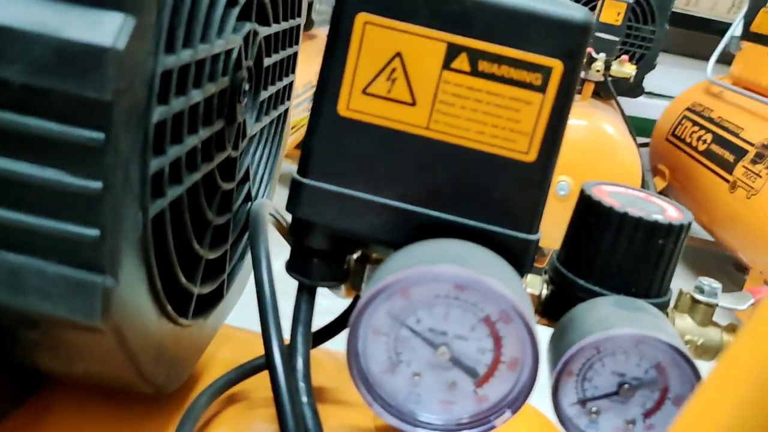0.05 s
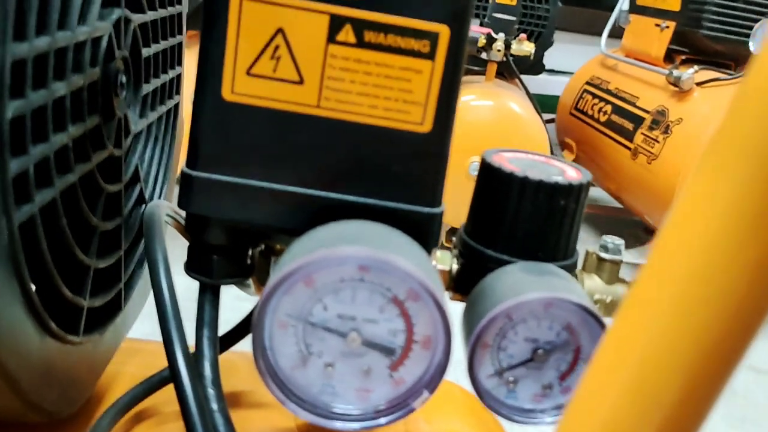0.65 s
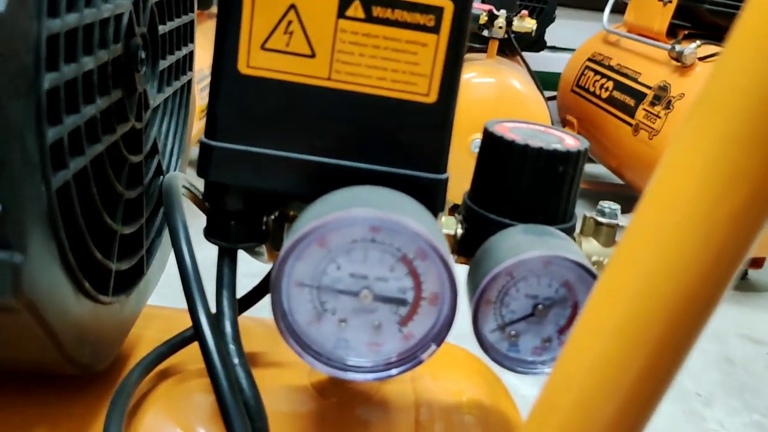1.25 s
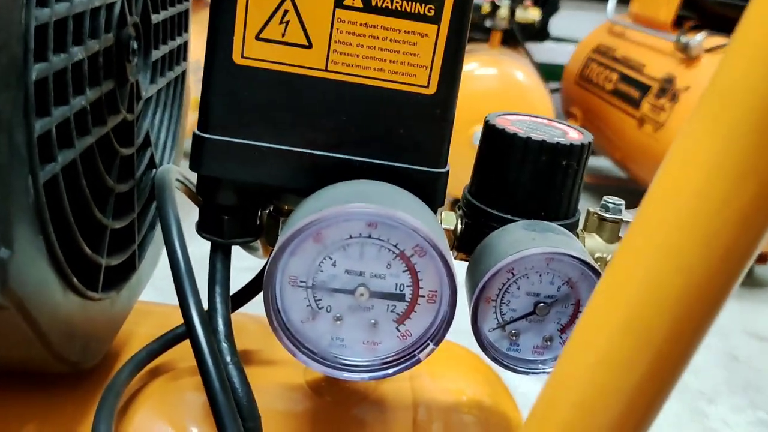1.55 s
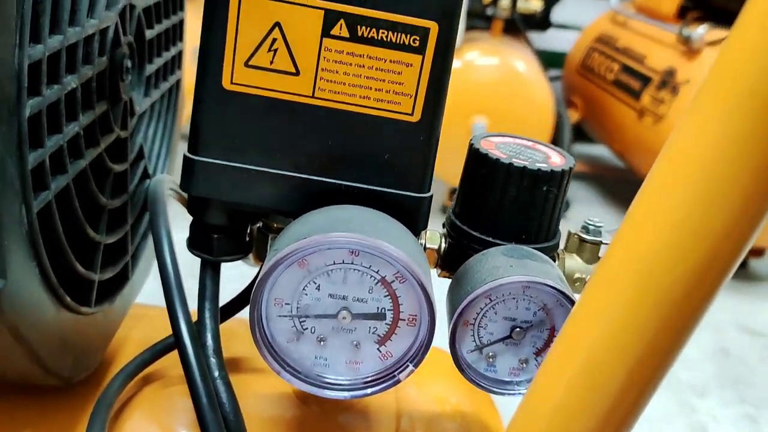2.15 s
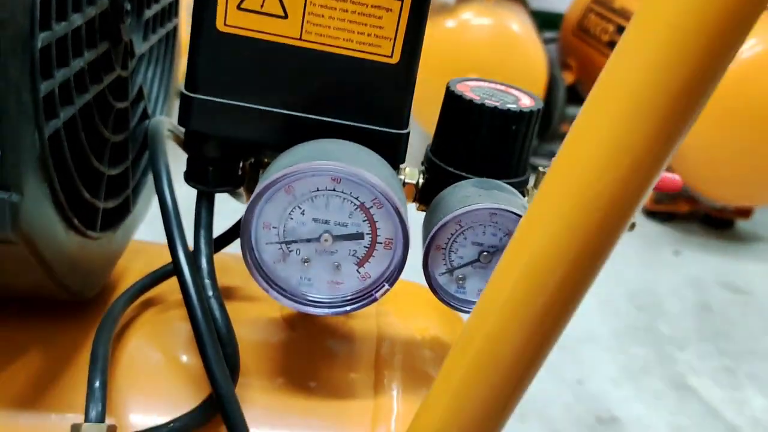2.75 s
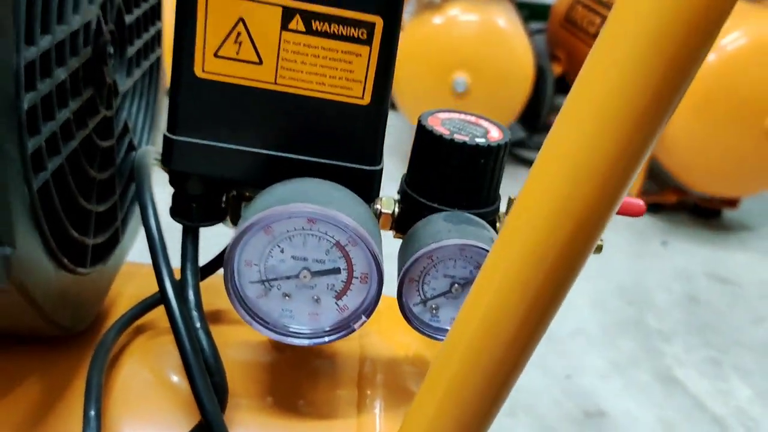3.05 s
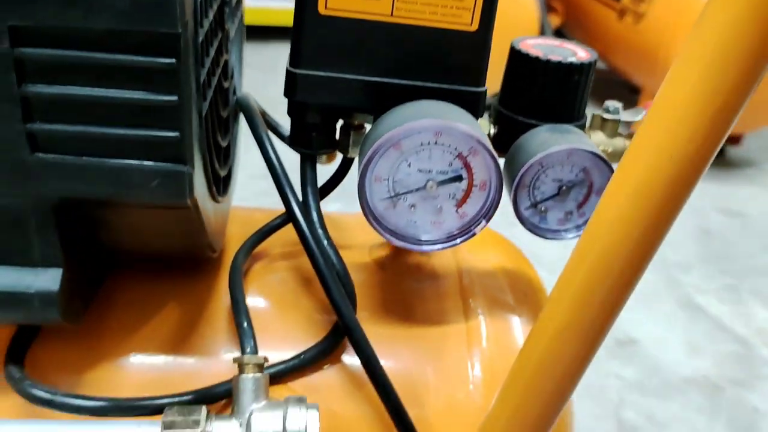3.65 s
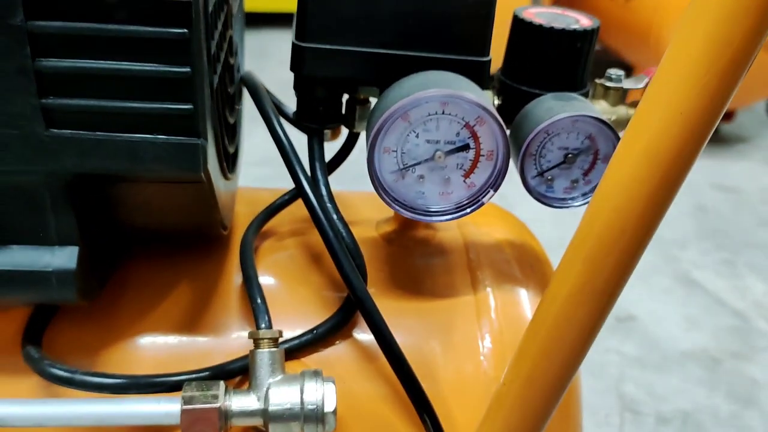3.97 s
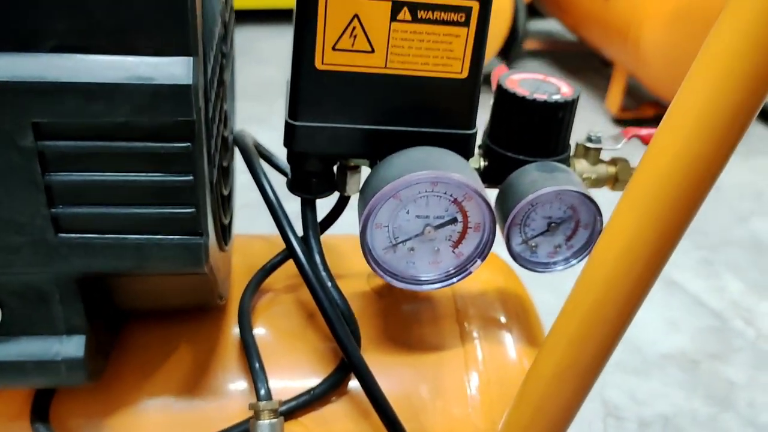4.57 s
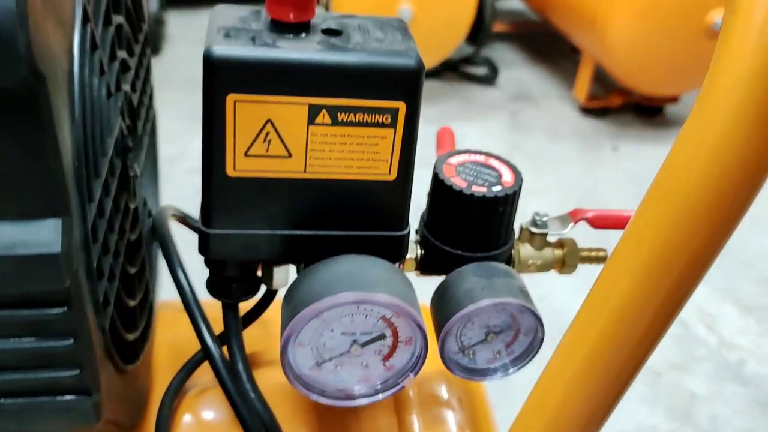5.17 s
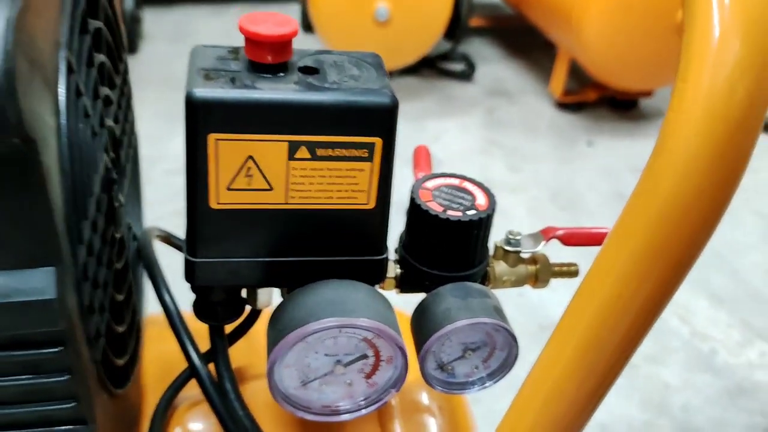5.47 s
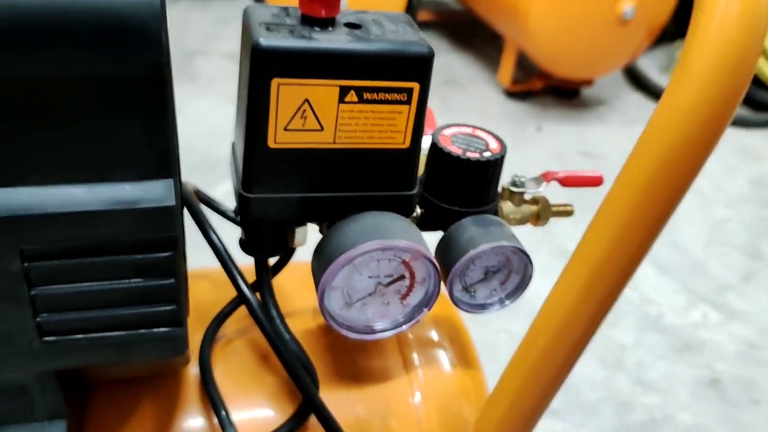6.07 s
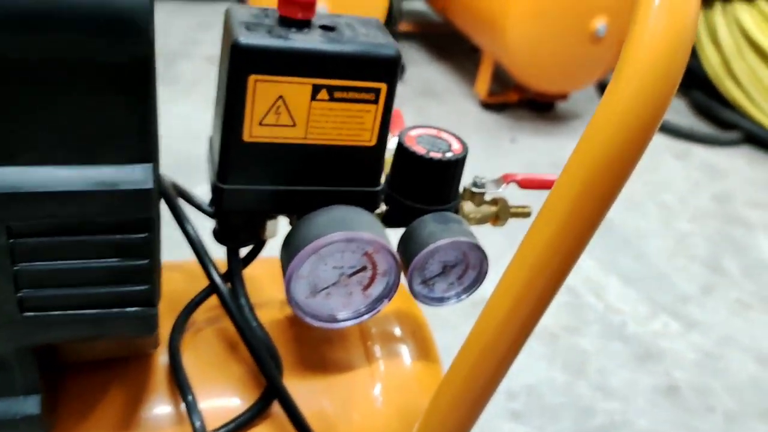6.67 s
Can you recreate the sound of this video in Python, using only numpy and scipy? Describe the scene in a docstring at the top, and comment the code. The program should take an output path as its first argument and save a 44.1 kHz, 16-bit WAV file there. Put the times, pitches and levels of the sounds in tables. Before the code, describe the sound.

Compressed air escapes from the open valve of a workshop compressor tank in a loud, continuous hiss. The close, hand-held microphone starts in the draught, so low wind rumble, flutter and a few sharp pops cover the jet. As the microphone backs away the buffeting fades, and the hiss grows clearer and slightly louder, its high sizzle sliding down in pitch.

```python
"""A loud hiss, buffeted by wind: compressed air leaves the open valve of a workshop compressor tank.
Turbulent mixing in the jet radiates broadband noise, heard directly, by reflection and as room sound.
A hand-held microphone starts in the draught, where eddies rumble, patter and slap on its two ports.
As it backs out, the buffeting fades and the jet is heard more openly; the jet is directional,
so its sizzling peak slides down in pitch as the angle changes."""
import sys
import numpy as np
from scipy import signal
from scipy.fft import rfft, irfft, next_fast_len
from scipy.io import wavfile

SR = 44100
rng = np.random.default_rng(int(sys.argv[2]) if len(sys.argv) > 2 else 0)


def inscribe(sig):
    """Save sig as 16-bit PCM at rate SR to the path in sys.argv[1].

    A 1-D sig is mono; a 2-D sig holds one channel per row.
    Samples are clipped to [-1, 1] before scaling.
    """
    pcm = np.round(np.clip(np.atleast_2d(sig).T, -1, 1) * 32767)
    wavfile.write(sys.argv[1], SR, pcm.astype(np.int16))


N = 305172

# Hiss at the microphone. Each row: time in seconds, relative level in dB.
HISS_LEVEL = [(0.0, -25), (0.17, -26), (1.02, -25), (1.44, -25.6), (1.56, -24.5), (2.62, -23.5),
              (3.2, -22.5), (3.57, -23), (3.66, -25), (3.82, -22.5), (3.95, -24), (4.05, -23.5),
              (4.3, -23.5), (4.37, -21.5), (4.55, -22), (5.15, -21), (5.22, -20.5), (5.99, -20),
              (6.06, -20.5), (6.17, -19.7), (6.25, -20.5), (6.92, -19)]
# Spectrum of the jet. Each row: frequency in Hz, relative spectral level in dB.
JET_SPECTRUM = [(60, -28), (350, -9), (900, -8.5), (1500, -7), (2000, -1.5), (2400, 2), (3600, 0.5),
                (4500, 1), (5700, 0.5), (7300, 0.5), (8400, 1), (9200, -3), (12300, -0.5), (13900, -2)]
# Resonances in the hiss. Each row: centre in Hz, width in Hz, lift in dB.
JET_RESONANCES = [(2945, 300, 2.5), (3910, 83, 1.6)]
# The microphone's way round the valve. Each row: time in seconds, open view of the jet from 0 to 1,
# left minus right in dB, lag of the left port in ms.
MIC_PATH = [(0, 0.03, 3, 0.2), (2.1, 0, 2, 0.21), (3.3, 0.04, 1.5, 0.2), (3.9, 0.33, 3.5, 0.18),
            (5.05, 0.25, 4, 0.18), (5.27, 0.2, 3.5, 0.268), (6, 0.68, 3.5, 0.26), (6.92, 0.96, 3, 0.29)]
# Shading of the hiss. Each row: frequency in Hz, gain in dB behind the fittings, gain in dB in open view.
SHADING = [(1400, -1.1, -0.9), (2360, -1.95, 1), (5930, 2.4, 1.1), (9540, 0.94, 3.5), (13600, 3.5, -9)]
# The sizzling peak, set by the angle to the jet. Each row: time in seconds, centre in Hz, lift in dB.
SIZZLE_PEAK = [(0, 15000, 0.5), (2.6, 14200, -2), (3.5, 13800, 1), (3.85, 13200, 4), (4.4, 11800, 2.5),
               (5.1, 10500, 3), (5.25, 10200, 4), (5.95, 10100, 3.5), (6.1, 9500, 0.3), (6.92, 9100, 2.5)]
PEAK_WIDTH_HZ = 2400
TROUGH_ABOVE_HZ, TROUGH_WIDTH_HZ, TROUGH_SHARE = 3300, 1300, 0.5   # a dip that follows the peak
# Nearness to the fittings. Each row: time in seconds, hollowness from 0 to 1.
HOLLOWNESS = [(0, 0), (1.4, 0), (1.6, 0.7), (2.5, 0.7), (2.8, 0.9), (3.5, 1), (3.7, 0.2), (4.4, 0)]
# Hollow colour among the fittings. Each row: centre in Hz, width in Hz, full lift in dB.
HOLLOW_BANDS = [(4130, 800, -0.4), (5000, 380, 2), (5750, 520, 2.5), (7300, 1000, -0.5),
                (10800, 2800, -1.3)]
# The highest treble. Each row: time in seconds, left lift in dB, right lift in dB.
TOP_TREBLE = [(0, 1.2, 0.8), (1.45, 2, 0.8), (1.6, 6, 1.6), (3.5, 3.6, 2.2), (3.8, 6, 1.5), (5.3, 1, 2),
              (6.92, 1, 3.7)]
TOP_TREBLE_HZ, TOP_TREBLE_WIDTH_HZ = 13950, 650
# Resonance of the right port, strongest facing the jet. Each row: time in seconds, lift in dB.
PORT_RING = [(0, 0.5), (2.4, 1), (5.1, 3.5), (5.25, 6.5), (5.98, 6), (6.1, 2.5), (6.92, 3)]
PORT_RING_HZ, PORT_RING_WIDTH_HZ = 8360, 1080
# Draught on the ports. Each row: time in seconds, relative level in dB, left minus right in dB.
DRAUGHT = [(0, -19, -1), (.3, -19.5, -0.5), (.55, -20, -2.5), (.75, -20, -1.5), (1.22, -21.5, 1.5),
           (1.5, -26, -2), (1.9, -27, -4.5), (2.1, -31.5, -7.5), (2.4, -30.5, -5), (2.6, -33.5, -9),
           (3.4, -39.5, -10), (3.7, -45, -7), (5.1, -43.5, -11.5), (5.35, -44, -19.5), (5.6, -43, -21),
           (5.97, -45.5, -26), (6.1, -42, -11), (6.92, -49, -18)]
# Spectrum of the buffeting. Each row: frequency in Hz, relative level in dB at the left, at the right.
BUFFET_SPECTRUM = [(20, -15, -15), (70, -6, -8.5), (125, -2.8, -4), (180, 0.2, -0.3), (350, -1, -0.8),
                   (700, -4.7, -2.4), (1200, -8.2, -5.4), (2000, -10.5, -8), (3000, -16, -13),
                   (6000, -40, -40)]
# Spectrum of the deep rumble. Each row: frequency in Hz, relative spectral level in dB.
RUMBLE_SPECTRUM = [(5, 5.5), (15, -4), (35, -1.5), (65, -13), (130, -12.5), (400, -31.5)]
# Rumble on the ports. Each row: time in seconds, relative level in dB, left minus right in dB.
RUMBLE_LEVEL = [(0, -38, 12), (1, -30.5, -4), (1.9, -27.5, 2), (2.15, -41, 17), (3, -38.5, 8),
                (3.8, -43.5, -1), (5.3, -46.5, -23), (5.9, -44, -28), (6.92, -46, -19)]
# Strong eddies. Each row: start in seconds, pulse level at the louder port in dB,
# left minus right in dB, share of the wake, share of the rebound.
SLAPS = [(1.375, -8, 16, 0.082, 0.01), (1.569, -9.5, -15, .15, 0.19), (1.7962, -10.5, 20, .05, 0.2),
         (1.853, -8.5, 19, .05, 0.47), (1.884, -16, 18, .1, .3), (1.928, -7.5, 13, .05, 0.27),
         (2.018, -14.5, 16, .05, .9), (2.183, -12, 19, .1, 0.095), (2.203, -12.5, 18, .2, .2),
         (2.377, -14.5, 15, .15, 0), (2.392, -15, 12, .2, 0), (2.435, -14.5, 16, .18, 0),
         (3.857, -12.5, 19, 0.24, 0.21), (5.354, -19, -22, 0.37, 0), (5.81, -19, -18, .2, 0),
         (5.988, -16, -20, 0.16, 0.16), (6.349, -29, -18, .4, 0.11), (6.451, -24, -20.5, 0.9, 0.11),
         (6.65, -24, -18, .4, 0)]
# Gusts. Each row: middle in seconds, length in seconds, level in dB, left minus right in dB.
GUSTS = [(0.302, 0.18, -28, 0), (0.458, .08, -29.5, 13), (0.773, 0.23, -26, 3), (1.0, 0.14, -29.5, -7),
         (1.2, 0.22, -27, 4), (1.64, 0.087, -34, 10), (2.558, 0.081, -43, 0), (5.337, .14, -39, -9),
         (5.88, .24, -39.5, -10)]
# Frequency response of the ports. Each row: frequency in Hz, left gain in dB, right gain in dB.
PORT_RESPONSE = [(1000, 0.2, -0.1), (2060, 1.2, -0.3), (2880, -0.5, 0.2), (3700, -0.3, 0.1),
                 (5500, -1.3, 1.2), (6600, -1.3, 1.3), (7700, -3.8, 1.6), (8600, -0.9, -0.3),
                 (9500, -0.6, 0.3), (10300, -0.2, -0.1), (12800, -0.4, 1), (13300, 0.4, 1.4)]

FITTINGS_SHADOW_DB = -3   # on the direct sound while the valve is hidden
SWIRL_DB, SWIRL_PER_S, SWIRL_WIDTH_HZ = 0.52, 2.7, 1640
# In the draught the jet roars; the lifts and the power share made at the ports hold at FULL_DRAUGHT_DB.
ROAR_HZ, ROAR_WIDTH_HZ, ROAR_LEFT_DB, ROAR_RIGHT_DB = 2130, 2920, 5, 13
ROAR_SHARE, FULL_DRAUGHT_DB = 0.56, -19.5
CUTOFF_HZ, CEILING = 14270, 0.85


def air_jet(level_db, flutter_db):
    """Turbulent mixing radiates noise; directivity and shadowing colour it as the microphone moves."""
    hiss_db, = in_time(HISS_LEVEL)
    view, pan_db, lag_ms = in_time(MIC_PATH)
    peak_hz, lift_db = in_time(SIZZLE_PEAK)
    draught_db, _ = in_time(DRAUGHT)
    draught = from_db(draught_db - FULL_DRAUGHT_DB)
    ring_db, = in_time(PORT_RING)
    hollowness, = in_time(HOLLOWNESS)
    top_db = in_time(TOP_TREBLE)

    def colour_db(hz, at):
        """Filters in cascade add in dB: first those common to both ports, then each port's own."""
        shaded_db, open_db = (at_hz(SHADING, hz, column) for column in (1, 2))
        view_db = shaded_db + view[at] * (open_db - shaded_db)
        hollow_db = hollowness[at] * sum(db * hump(hz, f, width) for f, width, db in HOLLOW_BANDS)
        trough = TROUGH_SHARE * hump(hz, peak_hz[at] + TROUGH_ABOVE_HZ, TROUGH_WIDTH_HZ)
        peak_db = lift_db[at] * (hump(hz, peak_hz[at], PEAK_WIDTH_HZ) - trough)
        shared_db = view_db + hollow_db + peak_db + swirl_db(hz, at)
        roar = hump(hz, ROAR_HZ, ROAR_WIDTH_HZ) * draught[at]
        right_db = ROAR_RIGHT_DB * roar + ring_db[at] * hump(hz, PORT_RING_HZ, PORT_RING_WIDTH_HZ)
        treble_db = top_db[:, None, at] * hump(hz, TOP_TREBLE_HZ, TOP_TREBLE_WIDTH_HZ)
        return shared_db + np.array([ROAR_LEFT_DB * roar, right_db]) + treble_db

    field = multipath(rng.standard_normal(N), lag_ms, direct_db=FITTINGS_SHADOW_DB * (1 - view),
                      echo_db=-2.5, room_db=2.0, nearest_ms=2.5, farthest_ms=17.0,
                      sway_ms=0.45, echo_from_hz=900)
    # noise made right at the ports carries no echoes
    local_share = np.clip(ROAR_SHARE * draught, 0, 1)
    field = np.sqrt(1 - local_share) * field + np.sqrt(local_share) * rng.standard_normal((2, N))
    hiss = recoloured(rms_one(shaped(field, jet_gain)), colour_db)
    return hiss * from_db(at_ports(hiss_db + level_db + flutter_db * drift(16), pan_db))


def jet_gain(hz):
    """Turbulence has a broad spectrum, on which each resonance raises a hump."""
    humps_db = sum(db / (1 + (2 * (hz - centre) / width) ** 2) for centre, width, db in JET_RESONANCES)
    return from_db(at_hz(JET_SPECTRUM, hz) + humps_db)


def swirl_db(hz, at):
    """Independent slow modulation of overlapping bands makes the colour of the hiss wander."""
    bands = (hump(hz, centre, SWIRL_WIDTH_HZ) for centre in np.linspace(1000, 14500, 14))
    return SWIRL_DB * sum(band * drift(SWIRL_PER_S)[at] for band in bands)


def multipath(jet, lag_ms, direct_db, echo_db, room_db, nearest_ms, farthest_ms, sway_ms, echo_from_hz):
    """Direct sound interferes with reflections off tank and fittings, over the room's diffuse field."""
    heard = from_db(direct_db) * np.array(delayed(jet, [lag_ms, 0]))
    # long waves diffract round the machine, only short ones are reflected
    reflected = signal.sosfilt(signal.butter(2, echo_from_hz, "high", fs=SR, output="sos"), jet)
    for port in heard:
        # the hand sways, and changing path lengths slide a fine comb through the hiss
        echo_ms = [ms * rng.uniform(0.85, 1.15) + sway_ms * drift(0.4)
                   for ms in np.geomspace(nearest_ms, farthest_ms, 6)]
        port += from_db(echo_db) * sum(delayed(reflected, echo_ms))
    diffuse = from_db(room_db) * rng.standard_normal((2, N))
    return rms_one(heard + diffuse)


def buffeting(level_db, rumble_db, lumpy_db, gusty_db, heaving_db):
    """Turbulent pressure is uncorrelated between the ports: each has quick lumps over a slow heave."""
    draught_db = at_ports(*in_time(DRAUGHT))
    heave_db = at_ports(*in_time(RUMBLE_LEVEL))
    out = np.zeros((2, N))
    for port in (0, 1):
        eddies = rng.standard_normal(N) * from_db(lumpy_db * drift(230) + gusty_db * drift(4.7))
        lumps = rms_one(shaped(eddies, lambda hz: from_db(at_hz(BUFFET_SPECTRUM, hz, port + 1))))
        out[port] += lumps * from_db(draught_db[port] + level_db)
        puffs = rng.standard_normal(N) * from_db(heaving_db * drift(8.6))
        heave = rms_one(shaped(puffs, lambda hz: from_db(at_hz(RUMBLE_SPECTRUM, hz))))
        out[port] += heave * from_db(heave_db[port] + rumble_db)
    return out


def eddy_slaps(pulse_s, rebound_s, wake_s, shudder_hz, shudder_s, shudder_db):
    """A large vortex passes a port: a sharp pressure drop, a rebound, a slow wake and a low shudder."""
    out = np.zeros((2, N))
    t = np.arange(SR // 4) / SR
    pulse, rebound = vortex_core(t, pulse_s), vortex_core(t - rebound_s, pulse_s)
    wake = t / wake_s * np.exp(1 - t / wake_s)
    low_pass = signal.butter(2, shudder_hz, fs=SR, output="sos")
    for start_s, peak_db, pan_db, wake_share, rebound_share in SLAPS:
        low_noise = rms_one(signal.sosfilt(low_pass, rng.standard_normal(len(t))))
        shudder = from_db(shudder_db) * low_noise * np.exp(-t / shudder_s)
        drop = pulse - rebound_share * rebound + wake_share * (wake + shudder)
        gains = from_db(at_ports(peak_db - abs(pan_db) / 2, pan_db))
        at = int(start_s * SR)
        out[:, at:at + len(t)] -= np.outer(gains, drop)[:, :N - at]
    return out


def small_eddies(per_s, level_db, draught_exponent, range_db, pulse_s):
    """Small vortices arrive as a Poisson process; their pattering pressure dips grow with the draught."""
    passing = rng.random((2, N)) < per_s / SR
    largest_db = level_db + draught_exponent * at_ports(*in_time(DRAUGHT))
    sizes = from_db(largest_db - range_db * rng.random((2, N)))
    pulse = vortex_core(np.arange(SR // 100) / SR, pulse_s)
    return -signal.fftconvolve(passing * sizes, [pulse], axes=1)[:, :N]


def vortex_core(t, pulse_s):
    """Pressure is low in a vortex core: the deficit rises to 1 at pulse_s, then dies away."""
    age = np.maximum(t, 0) / pulse_s
    return age ** 2 * np.exp(2 - 2 * age)


def gust_throb(centre_hz, width_hz):
    """Gusts modulate the amplitude of a low, hollow band of noise, independent at each port."""
    t = np.arange(N) / SR
    swell = sum(np.outer(from_db(at_ports(db, pan_db)), hump(t, middle_s, length_s))
                for middle_s, length_s, db, pan_db in GUSTS)
    band = shaped(rng.standard_normal((2, N)), lambda hz: hump(hz, centre_hz, width_hz))
    return swell * rms_one(band)


def from_db(db):
    """Amplitude ratio of a level in decibels."""
    return 10 ** (np.asarray(db) / 20)


def rms_one(x):
    """Normalisation to unit mean power."""
    return x / np.sqrt(np.mean(x ** 2) + 1e-20)


def at_ports(db, pan_db):
    """A level difference splits evenly between left and right."""
    return np.array([db + pan_db / 2, db - pan_db / 2])


def hump(x, centre, width):
    """Gaussian of height 1, with the given full width at half height."""
    return np.exp(-np.log(2) * (2 * (x - centre) / width) ** 2)


def in_time(rows):
    """Linear interpolation of each column of a time table at every sample."""
    seconds, *columns = np.transpose(rows)
    return np.array([np.interp(np.arange(N) / SR, seconds, column) for column in columns])


def at_hz(rows, hz, column=1):
    """Interpolation of a spectrum on a logarithmic frequency axis."""
    columns = np.transpose(rows)
    return np.interp(np.log(hz + 1e-3), np.log(columns[0]), columns[column])


def shaped(x, gain_at):
    """Zero-phase filtering: the spectrum is multiplied by a gain that depends on frequency."""
    size = next_fast_len(N + 4096)
    hz = np.arange(size // 2 + 1) * SR / size
    return irfft(rfft(x, size) * gain_at(hz), size)[..., :N]


def recoloured(x, db_at, size=512):
    """Time-varying filtering: short-time spectra take a gain in dB by frequency and sample number."""
    hz, seconds, frames = signal.stft(x, SR, nperseg=size)
    at = np.minimum(seconds * SR, N - 1).astype(int)
    return signal.istft(frames * from_db(db_at(hz[:, None], at)), SR, nperseg=size)[1][..., :N]


def drift(corner_hz):
    """Low-passed noise wanders smoothly with unit power; it is computed at every 20th sample."""
    pole = np.exp(-40 * np.pi * corner_hz / SR)
    slow = signal.lfilter([1], [1, -2 * pole, pole * pole], rng.standard_normal(N // 20 + 4002))[4000:]
    return np.interp(np.arange(N) / 20, np.arange(len(slow)), rms_one(slow))


def delayed(x, delays_ms):
    """Propagation delay: one copy for each fixed or moving delay, read with fourfold oversampling."""
    fine = signal.resample_poly(x, 4, 1)
    return [np.interp(4 * (np.arange(N) - ms * SR / 1000), np.arange(len(fine)), fine, left=0)
            for ms in delays_ms]


def scene():
    """Superposition of the jet's sound and the pressure of its draught on the ports."""
    return (air_jet(level_db=4.5, flutter_db=0.55)
            + buffeting(level_db=-0.87, rumble_db=-2.0, lumpy_db=2.5, gusty_db=-0.14, heaving_db=3.5)
            + small_eddies(per_s=40, level_db=-2.5, draught_exponent=0.63, range_db=19, pulse_s=0.00053)
            + eddy_slaps(pulse_s=0.0005, rebound_s=0.0022, wake_s=0.013,
                         shudder_hz=80, shudder_s=0.065, shudder_db=-15)
            + gust_throb(centre_hz=264, width_hz=255))


def record(dry):
    """The microphone is a band-limited, saturating transducer with its own response at each port."""
    coloured = shaped(dry, lambda hz: from_db([at_hz(PORT_RESPONSE, hz, column) for column in (1, 2)]))
    # steady pressure leaks away
    vented = signal.sosfilt(signal.butter(1, 4, "high", fs=SR, output="sos"), coloured)
    rounded = vented / (1 + (vented / CEILING) ** 8) ** (1 / 8)
    return shaped(rounded, lambda hz: 1 / np.sqrt(1 + (hz / CUTOFF_HZ) ** 700))   # steep treble cut


dry = scene()
out = record(dry)
inscribe(out)
```